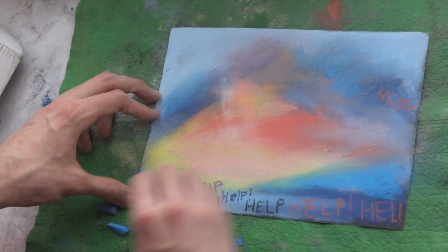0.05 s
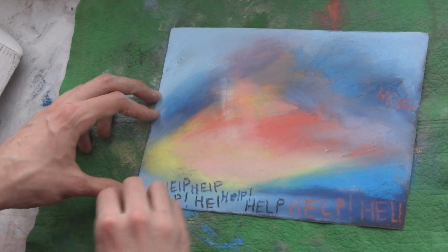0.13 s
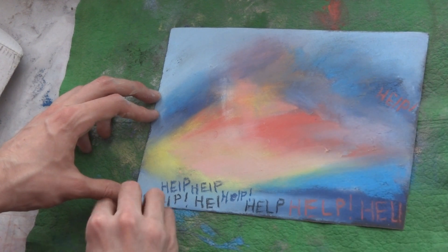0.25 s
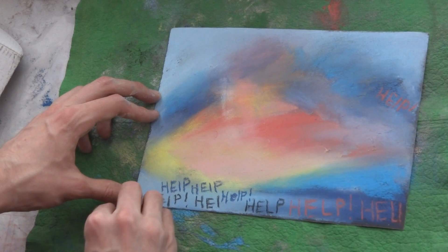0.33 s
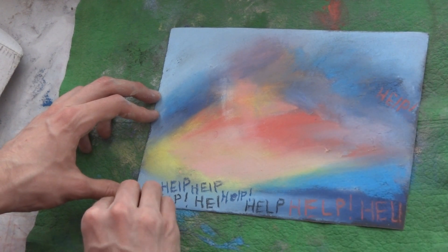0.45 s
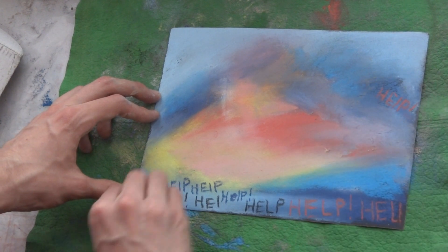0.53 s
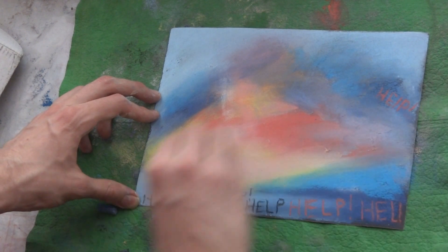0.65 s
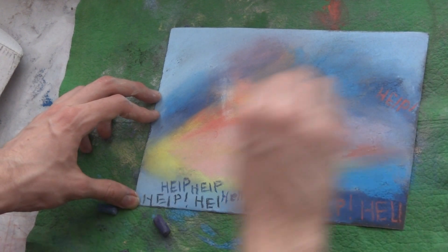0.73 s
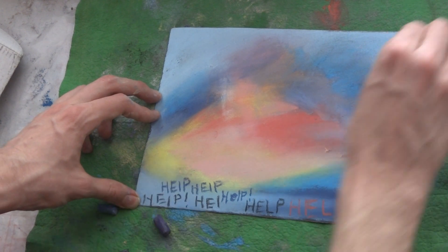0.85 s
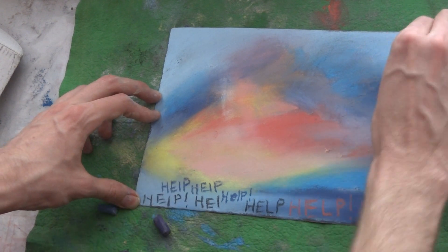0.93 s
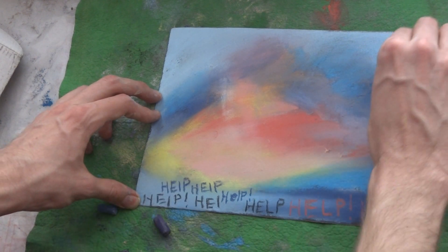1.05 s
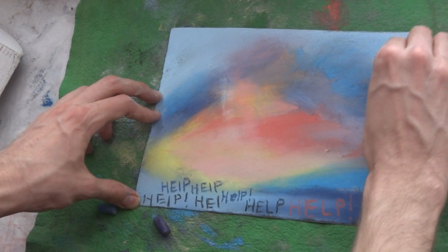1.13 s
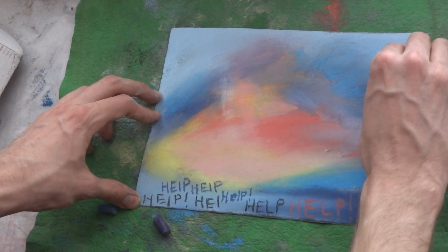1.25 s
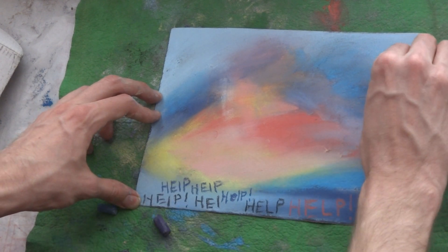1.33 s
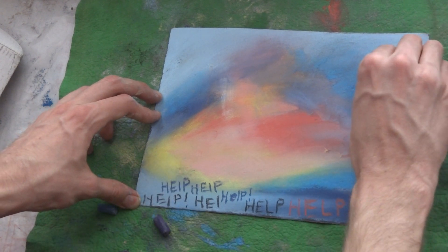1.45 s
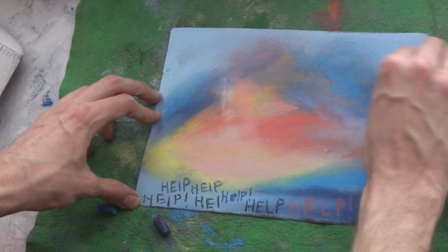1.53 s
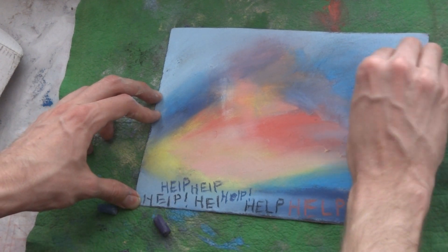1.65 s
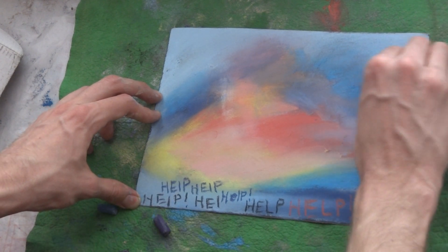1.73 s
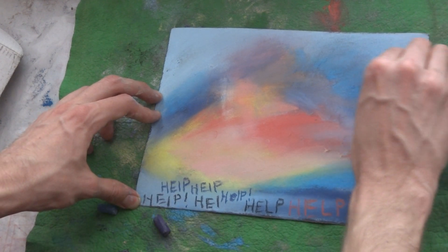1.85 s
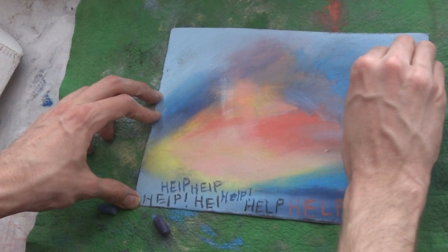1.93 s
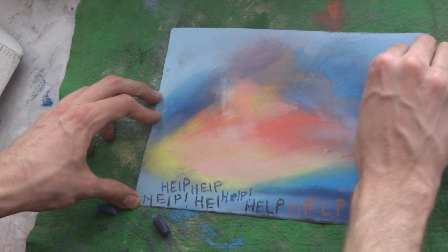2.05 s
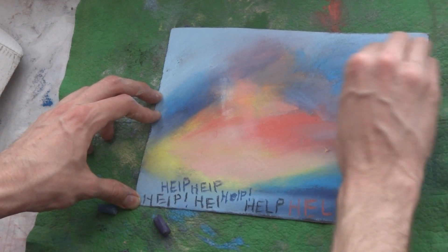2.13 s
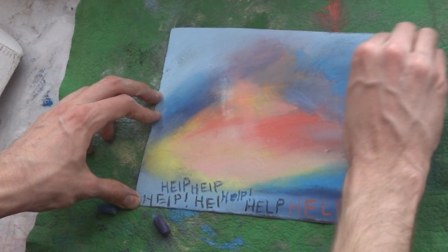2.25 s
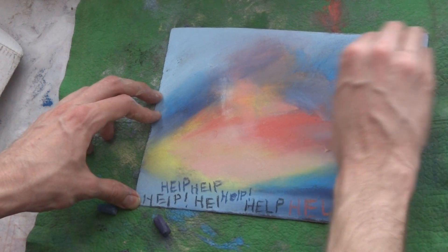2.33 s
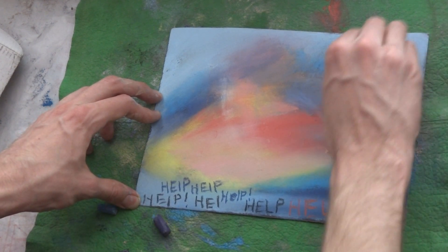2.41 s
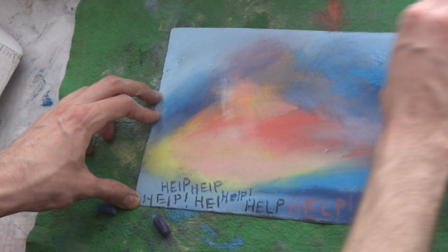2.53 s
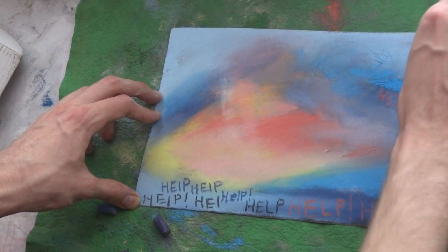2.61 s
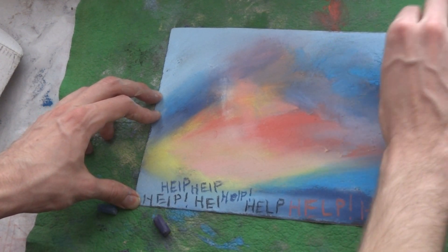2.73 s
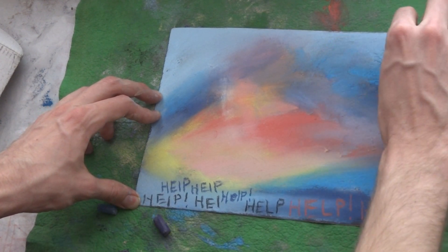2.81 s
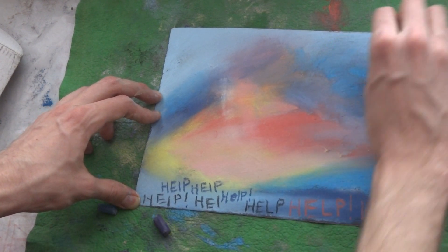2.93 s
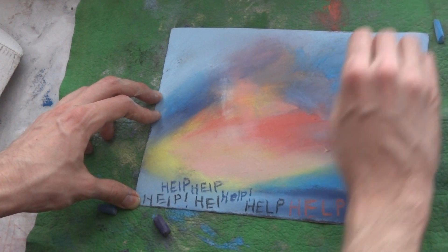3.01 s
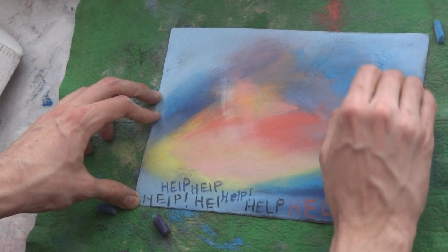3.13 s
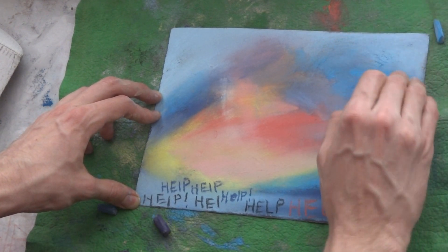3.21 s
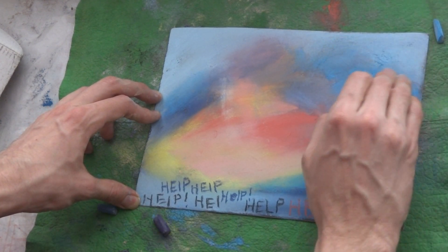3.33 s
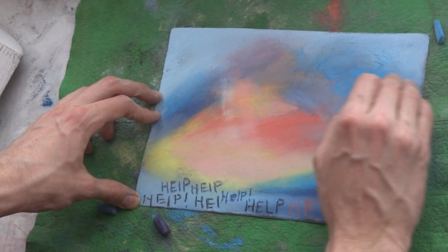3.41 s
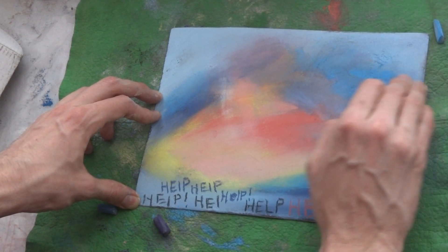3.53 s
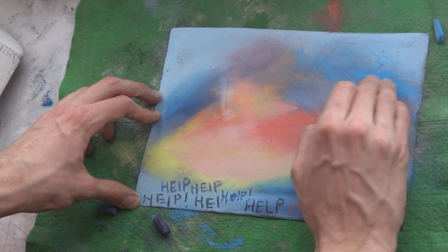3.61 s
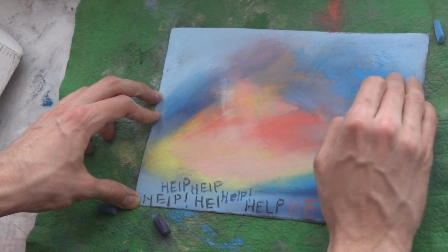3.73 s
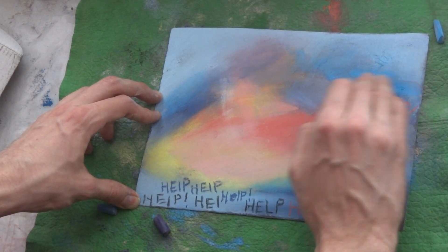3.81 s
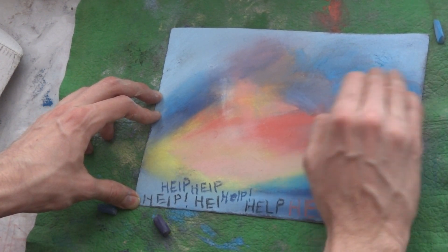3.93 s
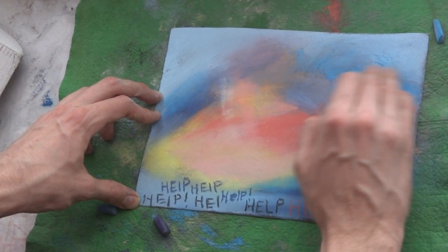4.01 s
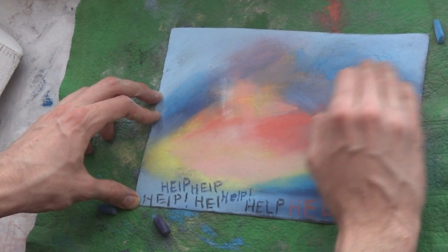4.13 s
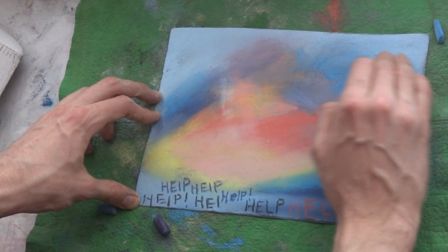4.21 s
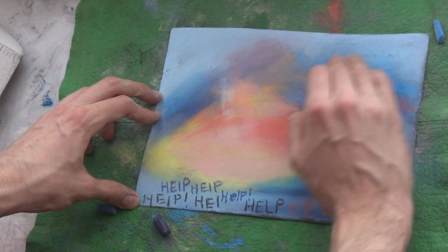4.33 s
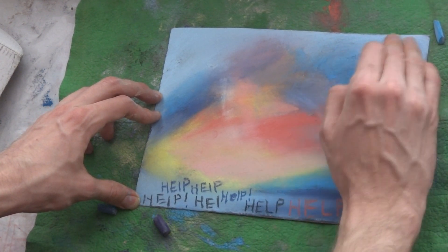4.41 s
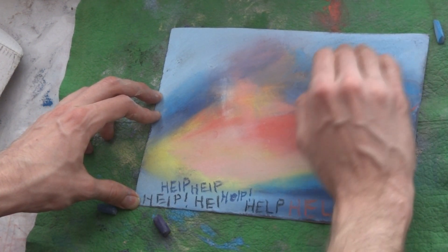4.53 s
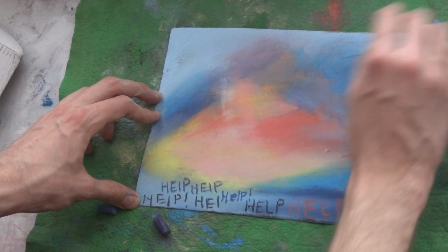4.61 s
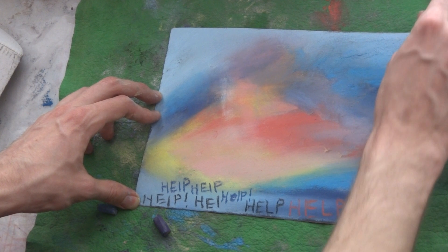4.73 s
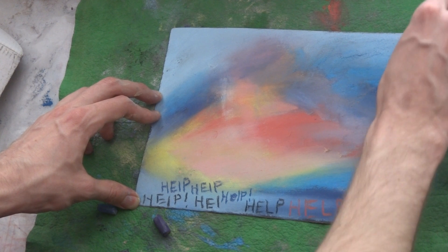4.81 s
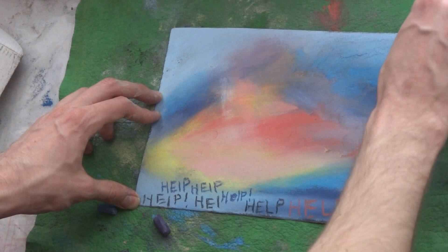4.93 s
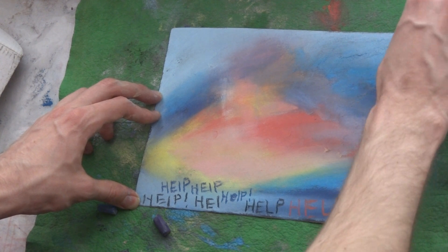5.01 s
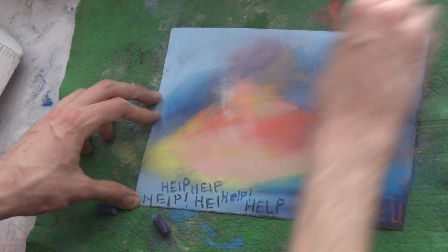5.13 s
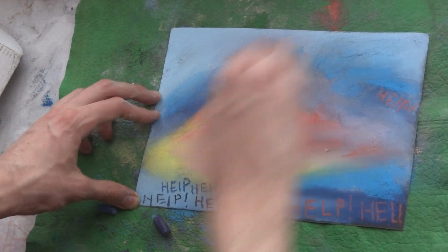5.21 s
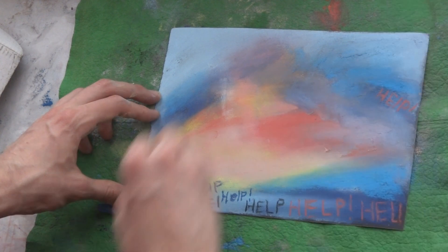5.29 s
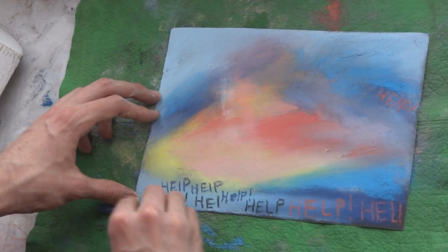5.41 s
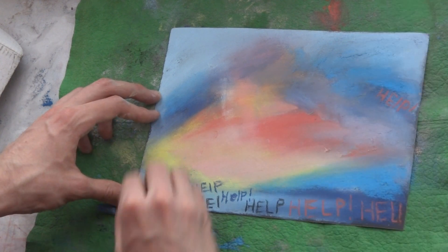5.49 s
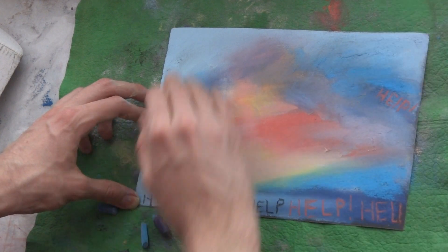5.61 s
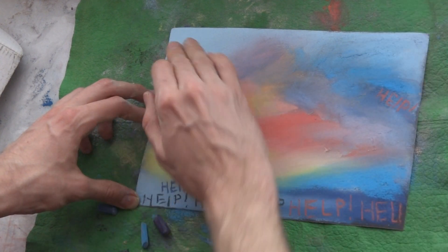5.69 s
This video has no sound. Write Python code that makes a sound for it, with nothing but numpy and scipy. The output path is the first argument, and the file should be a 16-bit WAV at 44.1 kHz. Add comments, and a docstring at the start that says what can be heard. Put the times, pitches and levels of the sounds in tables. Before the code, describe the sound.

Fingertips work dry pastel into rough paper, close to a stereo microphone in a small room. Very faint brushing comes at about 0.3 to 0.6 seconds. From 1.2 seconds the fingers rub quickly back and forth, about nine dry, scratchy strokes a second, growing louder until they stop at about 2.6 seconds. A sharp tick of a nail or crumb stands out at 2.1 seconds. A second, softer run begins gently at 3.2 seconds, builds a little and ends at about 4.6 seconds. Light brushing and a few tiny ticks follow from 4.8 to 5.3 seconds. Just after that, a hard pastel stick taps the table once, slightly to the right, with a small dry click, and settles at once. Underneath, a faint fan-like drone swells and sinks throughout, and the room adds only a slight, short echo.

```python
"""A work table in a small room, a stereo microphone close to the hand; a fan-like drone swells and sinks.
Fingertips brush dry pastel into sanded paper, then rub it in quick back-and-forth strokes from 1.2 s.
Skin catches on thousands of grit points, the sheet's resonances change with the place pressed, and a few
nails and crumbs tick, loudest at 2.1 s. A second run starts at 3.2 s and ends in light brushing.
At 5.3 s a pastel stick is tapped once, a little to the right, and settles."""
import sys
import numpy as np
from scipy import signal
from scipy.fft import rfft, irfft
from scipy.io import wavfile

SR = 44100
rng = np.random.default_rng(int(sys.argv[2]) if len(sys.argv) > 2 else 0)


def unload_audio(sound):
    """Save the sound as a 16-bit wav file, at the path given as the first command line argument."""
    columns = np.transpose(np.atleast_2d(sound))
    # keep every value between -1 and 1, then stretch to whole-number steps
    steps = np.round(np.clip(columns, -1, 1) * 32767)
    wavfile.write(sys.argv[1], SR, steps.astype(np.int16))


N = 254016

# finger strokes: break_loose_s, slide_s, relative_level_db
STROKES = [(0.304, 0.05, -56), (0.355, 0.077, -50), (0.46, 0.14, -55), (1.183, .078, -43.5),
           (1.288, .106, -31), (1.415, 0.099, -30), (1.518, 0.1, -24.5), (1.639, .094, -24),
           (1.752, 0.096, -24.5), (1.868, 0.15, -26.5), (2.026, 0.1, -27.5), (2.123, .12, -23),
           (2.248, 0.094, -24.5), (2.355, 0.1, -19.5), (2.456, 0.096, -19.5), (2.528, 0.07, -37.5),
           (3.16, 0.069, -56.5), (3.216, 0.083, -52), (3.361, 0.053, -36), (3.44, .116, -39),
           (3.59, 0.11, -33), (3.727, .07, -34.5), (3.826, 0.099, -32.5), (3.961, .068, -31.5),
           (4.053, 0.09, -30.5), (4.163, 0.091, -30), (4.28, .1, -28.5), (4.392, 0.096, -30.5),
           (4.49, 0.12, -32), (4.808, 0.054, -39.5), (4.852, 0.063, -48), (4.92, 0.08, -47),
           (4.986, 0.093, -51.5), (5.05, 0.1, -45.5)]
# colour of the rubbing at each place on the sheet: frequency_hz, gain_db
BRUSH_COLOUR = [(1180, -20.5), (2000, -10.5), (2900, -1.5), (4210, 1), (6260, 5.5), (8120, -1.5),
                (10600, -3), (14600, -5.5), (15800, -16)]
EDGE_COLOUR = [(60, -51), (250, -18.5), (450, -17), (900, -11.5), (1500, -7), (2400, -3), (3200, -5),
               (6000, 1), (7800, -3.5), (12000, -1.5), (14200, 1), (15800, -8.5)]
CORNER_COLOUR = [(60, -43), (300, -37.5), (950, -22), (1500, -15), (2800, -7), (3500, -8.5), (4700, -4.5),
                 (6400, -13), (7900, -9.5), (10800, -3.5), (14500, -5.5), (15800, -10)]
MARGIN_COLOUR = [(150, -31), (500, -21), (850, -20.5), (1400, -9.5), (2400, -6.5), (3100, -5), (4700, -1),
                 (7500, -4.5), (11000, 4), (13600, 1.5), (15800, -6)]
# resonances of sheet and hand at those places: pitch_hz, width_hz, gain_db
BRUSH_PEAKS = [(2870, 190, -2), (6200, 250, -1), (6500, 250, -1), (10600, 300, -1), (11600, 300, -1),
               (13300, 150, 0)]
EDGE_PEAKS = [(1450, 87, 5.5), (1820, 84, 0.5), (2120, 130, -0.5), (2512, 61, 5), (3660, 720, -1),
              (6020, 320, -4), (8980, 480, -3.5), (9100, 140, -22), (9970, 270, -4.5), (12070, 190, 3),
              (13200, 200, -5), (13900, 180, -1.5)]
CORNER_PEAKS = [(1492, 70, -8), (1863, 83, -10), (2560, 140, -6), (2960, 33, -1), (4300, 100, -15),
                (4860, 200, -6.5), (6060, 91, -3), (6720, 380, -1), (9000, 49, 1.5), (10800, 860, -8.5),
                (12000, 160, -14), (13000, 140, -10.5)]
MARGIN_PEAKS = [(1458, 92, 3), (2105, 23, 7), (2520, 110, 6), (3940, 220, 1.5), (4650, 94, -12),
                (5600, 170, -1), (6120, 200, 0), (8500, 83, 5), (9270, 96, -1), (10700, 190, -11),
                (13100, 98, -15), (13200, 100, 3)]
# the hand moves to its next place: start_s
PLACE_STARTS = [0, 1.0, 2.3, 3.0, 4.7]
# the hand rolls between flat pad (more body) and fingertip (more top): time_s, body_db, top_db
HAND_ROLL = [(0.3, 10, 8.5), (1.5, -0.5, 2), (2.2, 0.7, 1.5), (2.35, 3, 0.6), (2.47, 2, -4), (3.3, 4.5, 0),
             (3.55, 1.5, -3.5), (3.97, 5.5, -2.8), (4.28, 1.5, -1.5), (4.5, -3, -2), (4.82, 7.5, 13)]

# ticks of nails and crumbs: start_s, peak_db
TICKS = [(1.216, -35), (1.261, -33.5), (2.1365, -10.5), (4.8805, -35), (5.1403, -33.5), (5.179, -41),
         (5.2233, -44), (5.255, -37.5)]
# colour of a tick and of the pastel's dry crack: frequency_hz, gain_db
TICK_COLOUR = [(200, -47), (1000, -13), (3000, -6), (6000, 5), (7700, 3), (9400, 5), (11000, 5.5),
               (13500, 7.5), (16000, 1)]
CRACK_COLOUR = [(500, -12.5), (1000, -2), (1350, -24), (2300, 3), (3000, 0), (4000, -20), (5500, -7),
                (7300, -7), (8500, -2), (10700, -2), (13000, -4), (14200, -15), (16000, -7)]
# modes of the pastel stick: pitch_hz, gain_db, t60_s
STICK_MODES = [(2400, -13, 0.022), (2830, -2.5, 0.013), (4330, -16.5, 0.022), (8650, -13, .003),
               (10900, -8, 0.0042), (12700, -11, .004)]

# colour of the room's tail and of the air's broad rush: frequency_hz, gain_db
ROOM_COLOUR = [(200, 13.5), (1000, 6.5), (3000, -2), (6000, -5), (10000, -8.5), (16000, -7)]
RUSH_COLOUR = [(25, -29), (80, -34), (125, -18), (180, -20), (220, -8), (340, -17.5), (450, -12), (750, -8),
               (1100, -10), (2000, -17.5), (3000, -20), (4000, -25.5), (8000, -31), (12500, -28),
               (15800, -31.5)]
# resonances of the drone: pitch_hz, width_hz, gain_db
DRONE_PEAKS = [(233, 7.4, -30), (270, 64, -8), (409.4, 18.6, 3), (525.5, 27, 4.5), (621, 9.2, -1),
               (689, 25, -0.5), (767, 27, -8.5), (1075, 14, -4.5), (1450, 47, -10.5), (2750, 75, -14)]
# swell of those resonances: time_s, relative_level_db
DRONE_SWELL = [(0.0, -64), (0.03, -57.5), (0.53, -58.5), (0.66, -69), (0.85, -61), (2.45, -57.5),
               (2.58, -60.5), (3.03, -56.5), (3.32, -68.5), (3.62, -58), (3.8, -71.5), (4.12, -56.5),
               (4.72, -65), (5.76, -60.5)]
# how alike the drone is left and right: frequency_hz, correlation
DRONE_LIKENESS = [(60, 0.99), (150, 0.91), (380, 0.82), (950, 0.54), (2380, 0.41), (5980, 0.61), (15000, 1)]


def rubbing():
    """All strokes, each coloured by the place under the fingers; light brushing catches fewer grains."""
    brush = dict(spectrum=BRUSH_COLOUR, peaks=BRUSH_PEAKS, ring_db=-3.0, place_db=-7.0,
                 sharpness=0.87, judder_db=3.1, skew=0.61, grains_per_s=4600)
    edge = dict(spectrum=EDGE_COLOUR, peaks=EDGE_PEAKS, ring_db=5.0, place_db=-5.5,
                sharpness=1.4, judder_db=1.47, skew=0.82, grains_per_s=7000)
    corner = dict(spectrum=CORNER_COLOUR, peaks=CORNER_PEAKS, ring_db=11.0, place_db=-7.0,
                  sharpness=0.65, judder_db=2.5, skew=0.6, grains_per_s=9000)
    margin = dict(spectrum=MARGIN_COLOUR, peaks=MARGIN_PEAKS, ring_db=-0.5, place_db=-5.5,
                  sharpness=1.36, judder_db=1.36, skew=0.79, grains_per_s=9000)
    places = [brush, edge, corner, margin, brush]
    out, last_stop_s = np.zeros(N), 0
    for loose_s, slide_s, level_db in STROKES:
        place = places[np.searchsorted(PLACE_STARTS, loose_s) - 1]
        creep_s = creep_time(loose_s - last_stop_s)
        add(out, loose_s - creep_s, stroke(loose_s, creep_s, slide_s, level_db, **place))
        last_stop_s = loose_s + slide_s
    return out


def stroke(loose_s, creep_s, slide_s, level_db, spectrum, peaks, ring_db, place_db,
           sharpness, judder_db, skew, grains_per_s, stuck_db=-11.5, break_s=0.013, size=16384):
    """One sweep: the finger creeps, breaks loose, speeds up and stops, its pressure juddering."""
    hz, t = bins(size), np.arange(size) / SR
    progress = np.clip(t / (creep_s + slide_s), 0, 1)
    speed = np.abs(np.sin(np.pi * progress ** skew))   # skew under 1 peaks early
    stuck = np.clip(.5 + (creep_s - t) / break_s, 0, 1)
    pressure = from_db(stuck_db * stuck + judder_db * drift(210.5, size))
    friction = grit(speed, grains_per_s)
    ringing = np.sqrt(1 + from_db(ring_db) ** 2 * resonance_power(pressed(peaks), hz))
    colour = from_db(at_hz(spectrum, hz)) * ringing * hand_roll(loose_s, hz) * hand_echoes(hz)
    scratch = shaped(friction, rms_one(colour))
    scratch = butter(scratch, 2, 90, "high")   # the sheet radiates no deep bass
    # slow sliding is duller: the treble needs more speed than the body
    body = butter(scratch, 1, 2600, "low")
    sound = body * speed ** (.5 * sharpness) + (scratch - body) * speed ** sharpness
    return from_db(level_db + place_db) * pressure * sound


def creep_time(pause_s, longest_s=.042, overlap_s=.009, lifted_s=.15, landing_s=.016):
    """Seconds of creep before breaking loose; the fingers turn one by one, so close strokes overlap."""
    if pause_s < lifted_s:
        return np.clip(pause_s + overlap_s, 0, longest_s)
    return landing_s   # after a longer pause the finger lands already moving


def grit(speed, grains_per_s, size_db=2.0, powder=0.65):
    """Skin slips off grit points, more often at speed, over the smooth hiss of loose powder."""
    size = len(speed)
    caught = rng.random(size) < grains_per_s * (.3 + speed) / SR
    signs = rng.choice([-1, 1], size)
    strength = from_db(size_db * np.minimum(rng.exponential(1, size), 4))
    return rms_one(rms_one(caught * signs * strength) + powder * rng.standard_normal(size))


def pressed(peaks, shift_share=0.0064, change_db=3.0):
    """Every new touch shifts the resonances a little and changes their strength."""
    pitch_hz, width_hz, gain_db = np.transpose(peaks)
    shift, change = rng.standard_normal((2, len(peaks)))
    return zip(pitch_hz * (1 + shift_share * shift), width_hz, gain_db + change_db * change)


def hand_roll(time_s, hz):
    """Gain per frequency as the hand rolls: the flat pad gives more body, the fingertip more top."""
    times, body, top = np.transpose(HAND_ROLL)
    body_db, top_db = np.interp(time_s, times, body), np.interp(time_s, times, top)
    return from_db(at_hz([(2200, body_db), (4000, 0.021), (6500, 0), (10000, top_db)], hz))


def hand_echoes(hz, strength=0.16):
    """Short reflections between hand and table ripple the spectrum, anew on each stroke."""
    delays_s = rng.uniform(0.000624, .007, (5, 1))
    return np.abs(1 + strength * np.exp(-2j * np.pi * hz * delays_s).sum(axis=0))


def ticks(snap_t60_s=0.0055, crumble_t60_s=.03, crumble_db=-5, size=4096):
    """A nail or crumb ticks: a tiny snap followed by a short crumbling."""
    out, t = np.zeros(N), np.arange(size) / SR
    fade = from_db(-60 * t / snap_t60_s) + from_db(crumble_db - 60 * t / crumble_t60_s)
    for start_s, peak_db in TICKS:
        crunch = shaped(rng.choice([-1, 1], size) * fade, from_db(at_hz(TICK_COLOUR, bins(size))))
        add(out, start_s, from_db(peak_db) * crunch / np.abs(crunch).max())
    return out


def stick_tap(start_s=5.3467, gain_db=-23, first_gap_s=.0026, bounce_loss_db=10,
              crack_db=16.5, crumble_db=-10.5, crumble_t60_s=0.027, size=4096):
    """The hard stick lands and bounces twice; each contact cracks, crumbles a little and rings briefly."""
    out, t = np.zeros(N), np.arange(size) / SR
    ring = sum(from_db(db - 60 * t / t60) * np.cos(2 * np.pi * hz * t) for hz, db, t60 in STICK_MODES)
    for bounce in range(3):
        crumble = rng.choice([-1, 1], size) * from_db(crumble_db - 60 * t / crumble_t60_s)
        force = from_db(crack_db) * (t == 0) + crumble
        crack = shaped(force, from_db(at_hz(CRACK_COLOUR, bins(size))))
        contact_s = start_s + 2 * first_gap_s * (1 - .5 ** bounce)   # the gap halves each time
        add(out, contact_s, from_db(gain_db - bounce_loss_db * bounce) * (ring + crack))
    return butter(out, 3, 650, "high")   # so small a body radiates no bass


def table_echoes(x, echo_db=-32.0):
    """Things nearby send a few faint early echoes, different ones to each side of the microphone."""
    out = np.zeros((2, N))
    for channel in out:
        for delay_s in rng.uniform(0.0011, 0.004, 4):
            add(channel, delay_s, from_db(echo_db) * x)
    return out


def room(x, t60_s=0.5, treble_t60_s=.25, split_hz=4200, wet_db=-12.5, width=0.17, size=32768):
    """The small room returns a faint diffuse tail whose treble dies first."""
    t = np.arange(size) / SR
    mid, side = rng.standard_normal((2, size)) * np.clip(t / 0.0051, 0, 1)
    diffuse = mid + width * side * [[1], [-1]]
    low = butter(diffuse, 2, split_hz, "low") * from_db(-60 * t / t60_s)
    high = butter(diffuse, 2, split_hz, "high") * from_db(-60 * t / treble_t60_s)
    tail = rms_one(low - high) / np.sqrt(size)
    tail = shaped(tail, from_db(wet_db + at_hz(ROOM_COLOUR, bins(size))))
    return signal.fftconvolve(x[None], tail, axes=1)[:, :N]


def drone(rush_db=-59.28, resonance_db=0.36, bass_cut_hz=170):
    """Moving air in the background: a steady broad rush and narrow resonances that swell and sink."""
    hz = bins(N)
    swell_db = np.interp(np.arange(N) / SR, *np.transpose(DRONE_SWELL))
    rush = air_noise(from_db(at_hz(RUSH_COLOUR, hz)))
    bass_cut = 1 / np.sqrt(1 + (bass_cut_hz / (hz + 1)) ** 6)
    resonances = air_noise(bass_cut * np.sqrt(resonance_power(DRONE_PEAKS, hz)))
    return from_db(rush_db) * rush + from_db(swell_db + resonance_db) * resonances


def air_noise(gain):
    """Steady noise of a given colour, partly alike on both sides of the microphone; rms 1."""
    alike = np.clip(at_hz(DRONE_LIKENESS, bins(N)), -.99, .99)
    mid, side = rfft(rng.standard_normal((2, N))) * gain
    return rms_one(irfft(np.sqrt(1 + alike) * mid + np.sqrt(1 - alike) * side * [[1], [-1]], N))


def microphone_hiss(hiss_db=-84.0, rumble_db=-91.0, whine_db=-83.0, whine_hz=9872):
    """Each channel has its own faint hiss and rumble; a thin electrical whine lies in both."""
    hiss = from_db(hiss_db) * rng.standard_normal((2, N))
    rumble = butter(rng.standard_normal((2, N)), 2, 110, "low")
    whine = from_db(whine_db) * np.sin(2 * np.pi * whine_hz * np.arange(N) / SR)
    return hiss + from_db(rumble_db) * rms_one(rumble) + whine


def from_db(db):
    """Decibels to gain."""
    return 10 ** (np.asarray(db) / 20)


def rms_one(x):
    """Scale to rms 1."""
    return x / np.sqrt(np.mean(x ** 2) + 1e-20)


def at_hz(points, hz):
    """Read a table on a log-frequency axis."""
    points = np.array(points)
    return np.interp(np.log(hz + 1), np.log(points[:, 0]), points[:, 1])


def bins(size):
    """Frequencies of a spectrum of this many samples."""
    return np.arange(size // 2 + 1) * SR / size


def butter(x, order, cutoff_hz, kind):
    """Low-pass or high-pass filter."""
    return signal.sosfilt(signal.butter(order, cutoff_hz, kind, fs=SR, output="sos"), x)


def shaped(x, gain):
    """Causal (minimum-phase) filter with the given gain per frequency."""
    size = x.shape[-1]
    cepstrum = irfft(np.log(gain + 1e-6), size)
    cepstrum[1:size // 2] *= 2
    cepstrum[size // 2 + 1:] = 0
    return irfft(rfft(x) * np.exp(rfft(cepstrum)), size)


def resonance_power(peaks, hz):
    """Summed power response of resonances: pitch_hz, width_hz, gain_db."""
    return sum(from_db(db) ** 2 / (1 + (2 * (hz - centre) / width) ** 2) for centre, width, db in peaks)


def drift(rate_hz, size):
    """A random curve that glides to a new value rate_hz times a second."""
    knots = rng.standard_normal(1024)
    return np.interp(np.arange(size) * rate_hz / SR, np.arange(len(knots)), knots)


def add(out, start_s, sound):
    """Mix a sound in at start_s."""
    at = max(round(start_s * SR), 0)
    out[at:at + len(sound)] += sound[:N - at]


def scene():
    """The hand works close in front of the microphone; the stick is tapped a little to the right."""
    paper, stick = rubbing() + ticks(), stick_tap()
    near = paper + table_echoes(paper) + stick * from_db([[-1.6], [1.6]])
    return near + room(paper + from_db(-19.0) * stick) + drone() + microphone_hiss()


def record(dry, cutoff_hz=15850):
    """The top of the microphone's signal is cut steeply."""
    return signal.sosfilt(signal.ellip(12, .1, 80, cutoff_hz, fs=SR, output="sos"), dry)


dry = scene()
out = record(dry)
unload_audio(out)
```